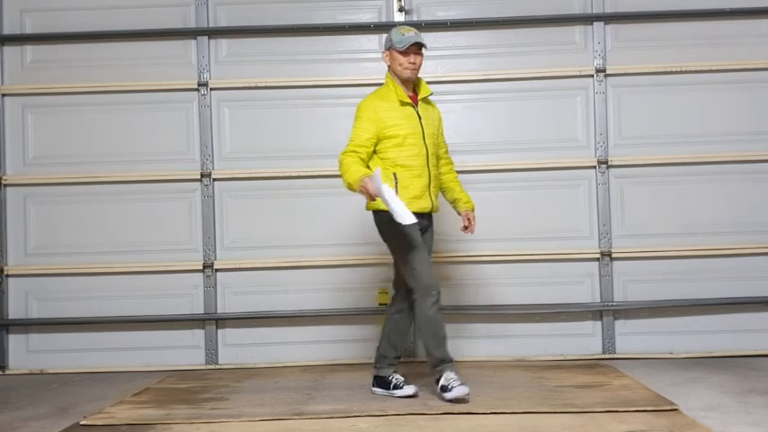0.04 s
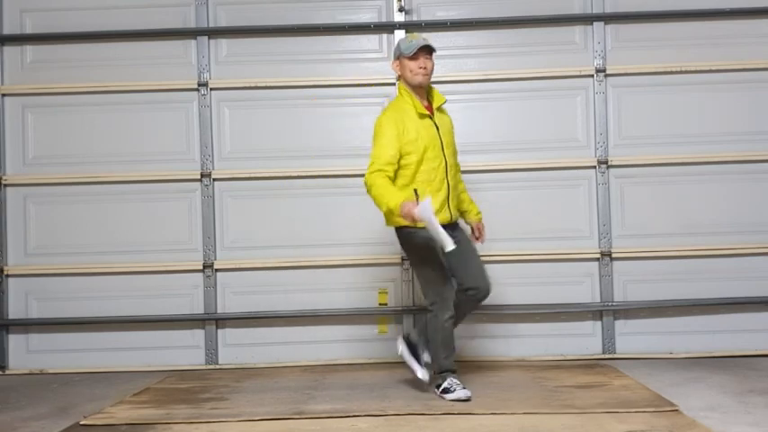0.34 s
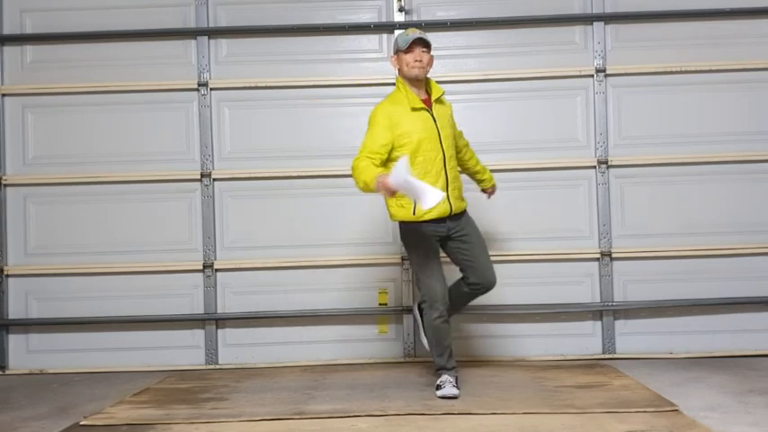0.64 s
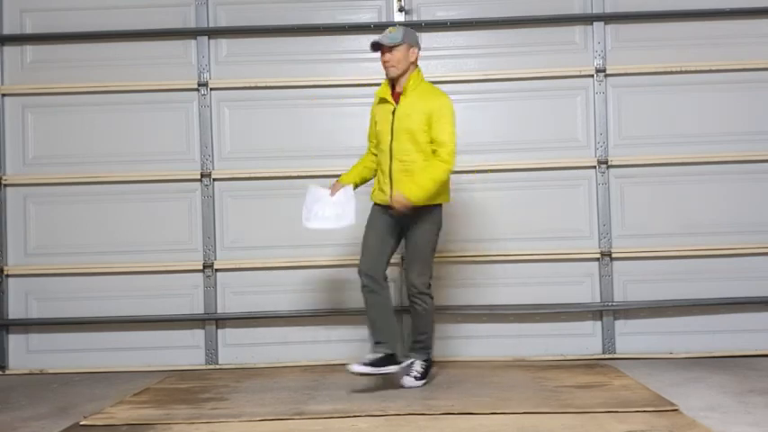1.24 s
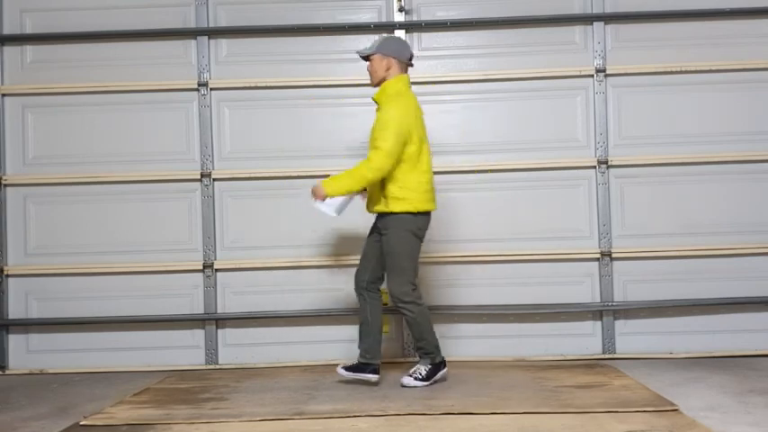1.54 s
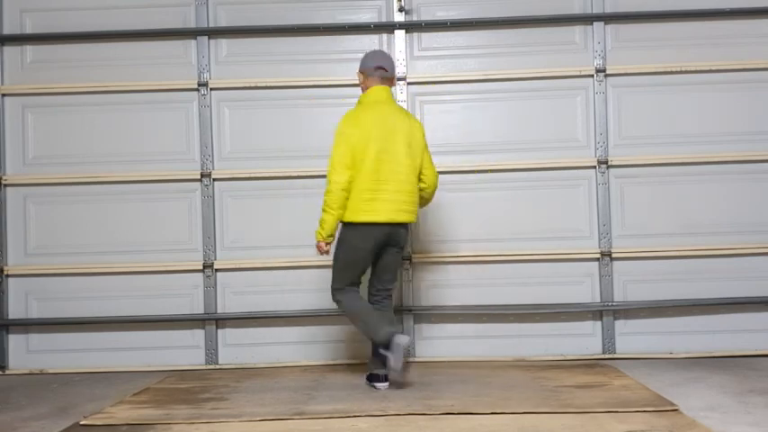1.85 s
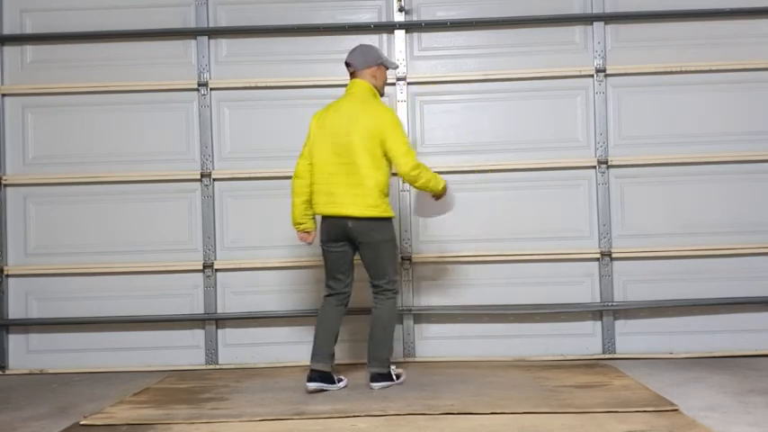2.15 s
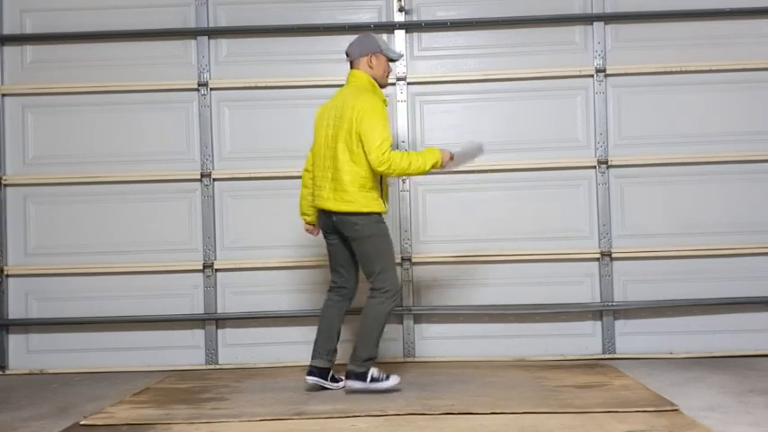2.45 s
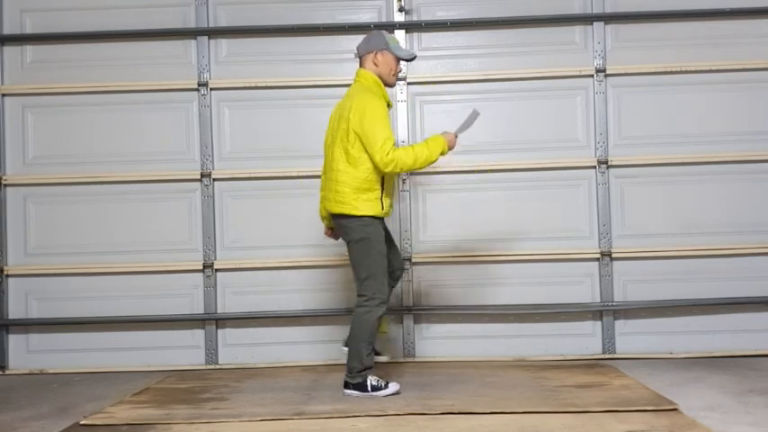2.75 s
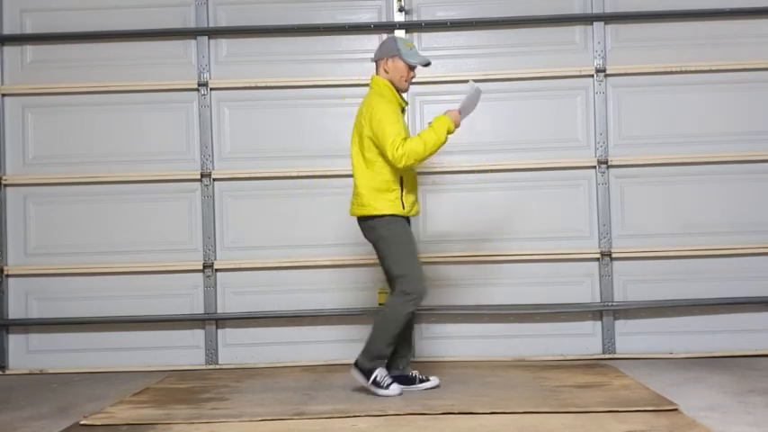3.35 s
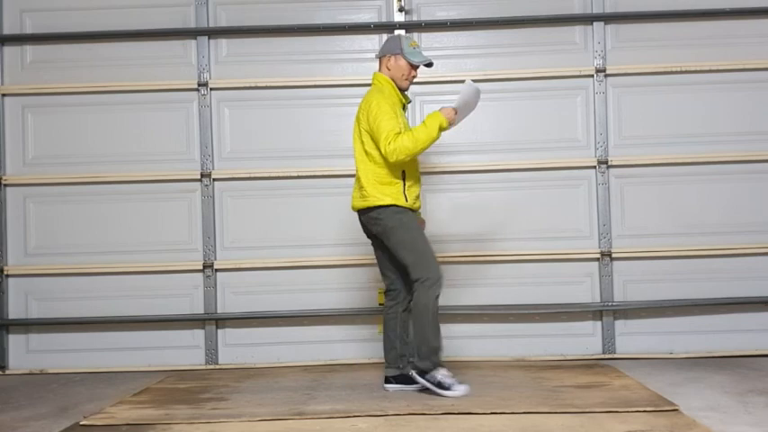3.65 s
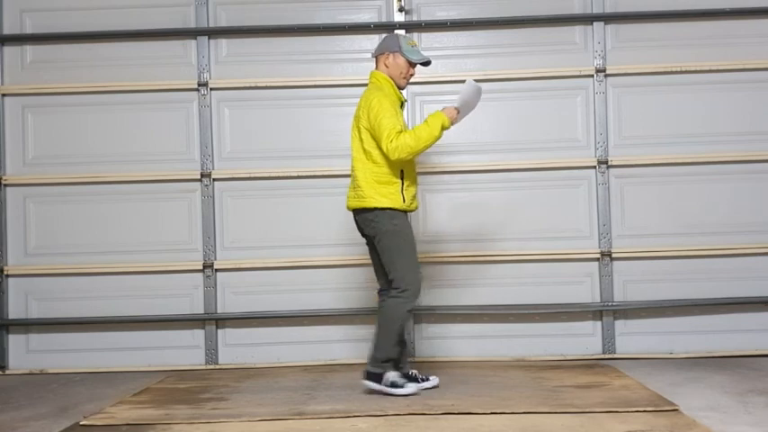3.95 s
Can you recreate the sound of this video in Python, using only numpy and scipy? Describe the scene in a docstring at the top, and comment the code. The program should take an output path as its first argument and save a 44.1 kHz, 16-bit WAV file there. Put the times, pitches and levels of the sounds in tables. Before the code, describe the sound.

Dancing footsteps tap and stamp on a wooden board in an echoing garage.

```python
"""A bare garage, where a dancer in rubber-soled shoes steps and stamps on a plywood board on the floor.
Each footfall is one short pulse: the board thumps, knocks and rings, the sole claps and snaps,
and trapped air pops. Soles scuff, the board flexes under shifting weight and clothes rustle.
Door and ceiling throw the sound back and the room reverberates, over a bed of low rumble and faint hiss."""
import sys
import numpy as np
from scipy import signal
from scipy.fft import rfft, irfft
from scipy.io import wavfile
from scipy.ndimage import uniform_filter1d

SR = 44100
rng = np.random.default_rng(int(sys.argv[2]) if len(sys.argv) > 2 else 0)


def dump(signal):
    """Clip the signal to [-1, 1] and save it as 16-bit WAV at the path in sys.argv[1]."""
    limited = np.clip(np.atleast_2d(signal).T, -1, 1)
    pcm = np.round(limited * 32767).astype(np.int16)
    wavfile.write(sys.argv[1], SR, pcm)


N = 176400

# Tone of the four layers of a footfall, low to high: freq_hz, level_db
THUMP_EQ = [(25, -55), (55, 2.5), (85, -13), (135, 0.5), (170, -4), (300, -12), (1000, -67)]
KNOCK_EQ = [(100, -59), (175, -19.5), (230, -9.5), (310, -0.5), (480, 0.5), (700, -4), (1000, -9),
            (1600, -22), (3000, -74), (8000, -93)]
CLAP_EQ = [(200, -23), (600, -10), (1000, -1), (1500, 0.5), (2100, -2), (2900, -6), (4000, -14),
           (6000, -31), (12000, -120)]
SNAP_EQ = [(1000, -24), (2800, 10.5), (4000, 4), (5600, 0), (7600, -4), (9200, -11.5), (12000, -7.5),
           (14000, -17.5), (16000, -31)]
# Footfall cues, each with its own layer mix:
# start_s, thump_db, knock_db, clap_db, snap_db, ring_hz, ring_db, pop_hz, pop_db, direct_trim_db
FOOTFALLS = [ (-0.055, 18, 21, 25, 3, 437, 17, 1940, 25.5, 0),
             (0.2373, 1, 17, 12, -39, 397, 20, 1890, 5, -2),
             (0.2446, 8.5, 25.5, 15, -15.5, 406, -6, 1900, 17, -5),
             (0.6185, 11.5, 21, 14.5, -11, 413, 29.5, 1520, 16.5, 0),
             (0.9545, 17.5, 31, 24.5, 0, 397, 20, 1420, 16, -0.5),
             (1.334, 1, 0.5, -24, -23, 397, 8, 1990, -21, -5),
             (1.7708, 17.5, 27.5, 26.5, 11.5, 335, 36.5, 2190, 27.5, 0),
             (1.783, -2, 9, 18.5, 3.5, 381.5, 35, 5830, 8.5, 8.5),
             (2.1219, 16.5, 32.5, 27.5, 2, 494, 42, 2550, 25, 2),
             (2.252, -3, 5, -4, -34, 560, 10, 1500, -4.5, -9),
             (2.5328, 25.5, 28.5, 24.5, 10, 423, 38.5, 1870, 27, 1.5),
             (2.9485, 2, 29.5, 25, 8.5, 397, 27, 3560, 17.5, 1.5),
             (3.1214, 17.5, 30, 27.5, 13, 407, 32, 2080, 25.5, 0),
             (3.329, 13, 20, 12.5, -33, 465, 27, 1700, 18.5, 2),
             (3.3418, 9, 22.5, 22, 2, 477, 1, 1720, 3, 2), (3.687, -4, 21, 16.5, -10, 376, 26, 1370, 23, 1),
             (3.694, -5, 31, 21, -2, 296, 28, 1470, 2, -1),
             (3.867, 14, 25, 19, -13, 470, 25, 2020, 20.5, 1),
             (3.875, 18, 26, 22.5, -2.5, 474, 15, 2060, 13, 1.5), ]


def footfalls(size=8192):
    """Each landing is one pulse, coloured by air squeezed from under the sole; then the board rings."""
    out = np.zeros((2, N))
    t = np.arange(size) / SR
    ring_attack_s = 0.0024
    for start_s, *layer_dbs, ring_hz, ring_db, pop_hz, pop_db, direct_trim_db in FOOTFALLS:
        layers = zip((THUMP_EQ, KNOCK_EQ, CLAP_EQ, SNAP_EQ), layer_dbs)
        power = sum(undb(curve(eq, size) + db) ** 2 for eq, db in layers)
        air_pop = undb(pop_db) * np.abs(rfft(resonance(pop_hz, size, t60_s=0.003))) ** 2
        impact = board_dispersion(tight_pulse(np.sqrt(power + air_pop ** 2)))
        ring = resonance(ring_hz, size, t60_s=0.067) * (1 - np.exp(-t / ring_attack_s))
        hit = -impact - undb(ring_db) * ring
        place(out, in_garage(hit, direct_trim_db), start_s)
    return out


def resonance(pitch_hz, size, t60_s):
    """A damped ring with unity gain at its pitch."""
    t = np.arange(size) / SR
    decay_rate = np.log(1000) / t60_s
    return 2 * decay_rate / SR * np.exp(-decay_rate * t) * np.cos(2 * np.pi * pitch_hz * t)


def tight_pulse(spectrum):
    """The tightest transient with this spectrum: a minimum-phase pulse."""
    cepstrum = irfft(np.log(spectrum + 1e-9))
    half = len(cepstrum) // 2
    cepstrum[1:half] *= 2
    cepstrum[half + 1:] = 0
    return irfft(np.exp(rfft(cepstrum)))


def board_dispersion(impact, corner_hz=1700):
    """Bending waves in the board carry the treble a little ahead of the bass."""
    warped = np.tan(np.pi * corner_hz / SR)
    allpass = (warped - 1) / (warped + 1)
    return signal.lfilter([allpass, 1], [1, allpass], impact)


# Scuff cues: start_s, length_s, level_db
SCUFFS = [(0.55, 0.081, -34.5), (0.69, 0.071, -44.5), (0.89, 0.095, -51)]
# Scuff tone: freq_hz, level_db
SCUFF_EQ = [(100, -25), (250, 4), (420, 6), (700, 3), (1800, 0), (3500, -10), (7000, -21), (14000, -35)]


def sole_scuffs():
    """Rubber slides over plywood in short, gritty scrapes."""
    return swells(SCUFFS, SCUFF_EQ, grain_db=1.5)


# Board flex cues: start_s, length_s, level_db
FLEXES = [(0.68, 0.11, -46), (0.88, 0.23, -41), (1.62, 0.051, -41.5), (1.78, 0.087, -36), (2.53, 0.12, -43)]
# Flex tone: freq_hz, level_db
FLEX_EQ = [(25, -30), (44, -20), (53, -3), (59, 0), (66, -5), (80, -17), (112, -10), (160, -24), (400, -55)]


def board_flex():
    """The plywood bends under shifting weight, giving soft bass swells."""
    return swells(FLEXES, FLEX_EQ)


# Cloth rustle and sleeve swish cues: start_s, length_s, level_db
RUSTLES = [(0.535, 0.087, -39), (0.78, 0.067, -53), (1.26, 0.063, -45), (1.40, 0.062, -61),
           (1.61, 0.38, -53), (2.83, 0.076, -48)]
SWISHES = [(1.405, 0.049, -56)]
# Their tones: freq_hz, level_db
RUSTLE_EQ = [(200, 1), (1000, 3), (2500, 6.5), (4500, -4), (7000, -7.5), (10000, -11.5), (15000, -12)]
SWISH_EQ = [(2000, -22), (8000, -20), (12000, 8.5), (15000, 0)]


def clothes():
    """Jacket and trousers rustle, and a sleeve brushes the jacket with a bright swish."""
    return swells(RUSTLES, RUSTLE_EQ) + swells(SWISHES, SWISH_EQ, grain_db=2)


def swells(cues, eq, grain_db=0):
    """Rubbing or bending: noise fades in and out once per move, roughened by grain_db of flutter."""
    t = np.arange(N) / SR
    envelope = np.zeros(N)
    for start_s, length_s, level_db in cues:
        progress = np.clip((t - start_s) / length_s, 0, 1)
        envelope += undb(level_db) * np.sin(np.pi * progress) ** 2
    grain = undb(grain_db * noise([(100, -12), (400, -28)]))
    grain /= np.sqrt(np.mean(grain ** 2))
    return in_garage(envelope * grain * noise(eq))[:, :N]


# Early reflections, relative to the reverb: delay_s, left_db, right_db
REFLECTIONS = [(.0025, -23, -30.5), (.0063, -14.5, -15), (0.0109, -17.5, -30.5), (0.0141, -70, -29.5)]


def in_garage(sound, direct_trim_db=0, size=32768):
    """Direct sound, reflections and a dull slap off the door; the bass comes mostly by way of the room."""
    direct_db, door_db = -12, -6.5
    room = reverb_tail(size)
    for delay_s, left_db, right_db in REFLECTIONS:
        room[:, int(delay_s * SR)] += undb([left_db, right_db])
    door_delay_s = 0.0125 + rng.uniform(-0.0013, 0.00099)
    door = undb(door_db) * signal.unit_impulse(size, int(door_delay_s * SR))
    room += signal.lfilter(*signal.butter(2, 560, "low", fs=SR), door)
    direct = undb(direct_db + direct_trim_db) * signal.unit_impulse(size)
    room += signal.lfilter(*signal.butter(1, 410, "high", fs=SR), direct)
    return signal.fftconvolve(sound[None], room, axes=1)


# Reverb time by band: freq_hz, t60_s
REVERB_TIMES = [(100, .5), (260, .5), (450, 0.61), (800, 0.548), (2100, 0.6551), (4800, 0.5948),
                (8000, 0.5064), (13000, 0.4234)]
# Colour the walls give the reverb: freq_hz, level_db
WALL_EQ = [(200, -0.5), (2000, -1.5), (5000, 0.5), (8000, 1.5), (12000, -5.5), (15000, -6)]


def reverb_tail(size):
    """Sparse echoes off bare walls thicken into a tail that dies away band by band."""
    t = np.arange(size) / SR
    dense_s, build_s, early_s = 0.03, 0.01, 0.03
    onset_db, early_gain = -9.5, 0.66
    density = np.clip((t / dense_s) ** 2, 0.02, 1)
    polarity = rng.choice([-1., 1.], (2, size))
    echoes = polarity * (rng.random((2, size)) < density) / np.sqrt(density)
    fade_in = 1 - (1 - undb(onset_db)) * np.exp(-(t / build_s) ** 2)
    early_lift = 1 + early_gain * np.exp(-t / early_s)
    decays = [fade_in * early_lift * np.exp(-np.log(1000) * t / t60_s) for _, t60_s in REVERB_TIMES]
    spectrum = rfft(widen(flatten(echoes, np.mean(decays, axis=0))))
    tail = np.zeros((2, size))
    for k, decay in enumerate(decays):
        band = curve([(hz, j == k) for j, (hz, _) in enumerate(REVERB_TIMES)], size)
        tail += irfft(spectrum * band) * decay
    tail /= np.sqrt(np.sum(tail ** 2) / 2)
    return irfft(rfft(tail) * undb(curve(WALL_EQ, size)))


def flatten(echoes, envelope):
    """Level out the broad peaks and dips of decaying echoes, so the room colours each step alike."""
    power = uniform_filter1d(np.abs(rfft(echoes * envelope)) ** 2, size=45, axis=1)
    return irfft(rfft(echoes) / np.sqrt(power))


# Stereo width of the room: freq_hz, side_minus_mid_db
WIDTH = [(50, -28), (125, -15.5), (250, -13.5), (500, -4.5), (1000, 1), (4000, 0)]
# Its balance: freq_hz, right_minus_left_db
BALANCE = [(250, 0), (1000, 0.6), (2200, 3), (4000, 2.1), (12000, 2)]


def widen(pair):
    """Two unrelated signals become a stereo image: near mono in the bass, leaning right in the treble."""
    size = pair.shape[1]
    mid, side = rfft(pair)
    width = undb(curve(WIDTH, size))
    lean = undb(curve(BALANCE, size) / 2)
    left = (mid + width * side) / lean
    right = (mid - width * side) * lean
    return irfft(np.array([left, right]) / np.hypot(1, width), size)


# Tone of the background rumble and hiss: freq_hz, level_db
RUMBLE_EQ = [(20, -23), (40, -15), (57, 3.5), (68, 6), (82, -36.5), (108, -3.5), (135, -24.5), (170, -14),
             (400, -45.5)]
HISS_EQ = [(100, 6), (400, 4.5), (900, -8), (2500, -1.5), (6000, -15.5), (15000, -48)]


def room_tone(rumble_db=-52, hiss_db=-62):
    """A steady bed of low rumble and faint hiss."""
    pair = [undb(rumble_db) * noise(RUMBLE_EQ) + undb(hiss_db) * noise(HISS_EQ) for _ in range(2)]
    return widen(np.array(pair))


def noise(eq):
    """Noise shaped by an EQ curve, at rms 1."""
    coloured = irfft(rfft(rng.standard_normal(N)) * undb(curve(eq, N)), N)
    return coloured / coloured.std()


def curve(points, size):
    """Draw (freq_hz, value) breakpoints across the bins of an FFT of this size."""
    hz, value = np.array(points, float).T
    return np.interp(np.log(np.fft.rfftfreq(size, 1 / SR) + 1), np.log(hz), value)


def undb(db):
    """Decibels to gain."""
    return 10 ** (np.asarray(db) / 20)


def place(out, sound, start_s):
    """Mix a stereo sound into the timeline at its cue."""
    start = int(round(start_s * SR))
    first, end = max(start, 0), min(start + sound.shape[1], N)
    if end > first:
        out[:, first:end] += sound[:, first - start:end - start]


def scene():
    """The mix: quiet movement and room tone under the footwork."""
    movement = clothes() + board_flex()
    return footfalls() + sole_scuffs() + movement + room_tone()


def record(dry):
    """The recorder rolls off the very top with a steep low-pass."""
    cutoff_hz = 15800
    return signal.sosfilt(signal.ellip(8, 0.2, 70, cutoff_hz, fs=SR, output="sos"), dry)


dry = scene()
out = record(dry)
dump(out)
```